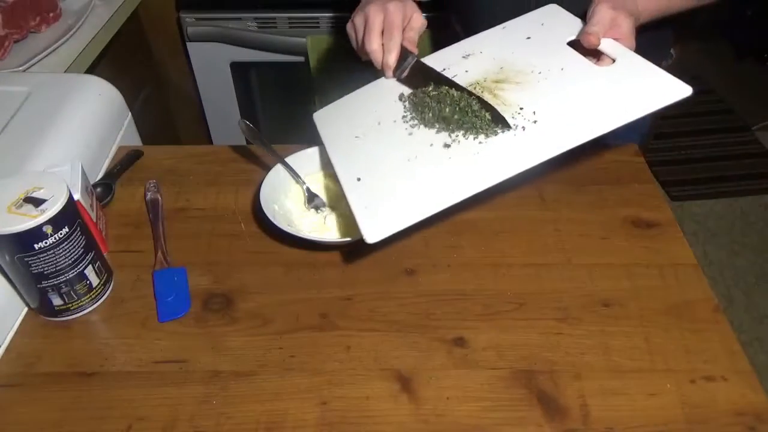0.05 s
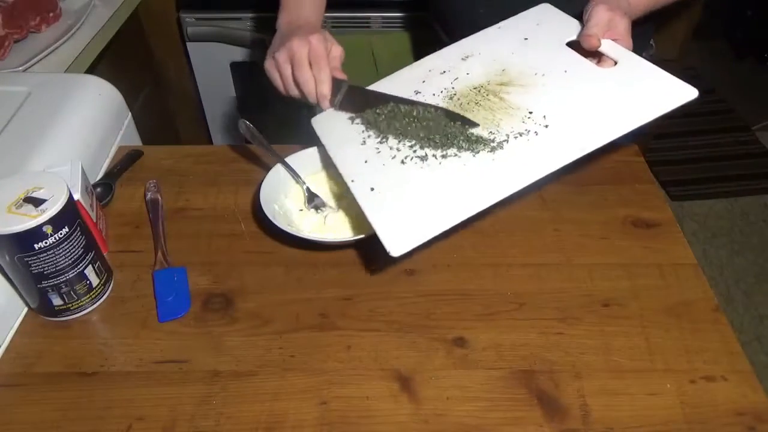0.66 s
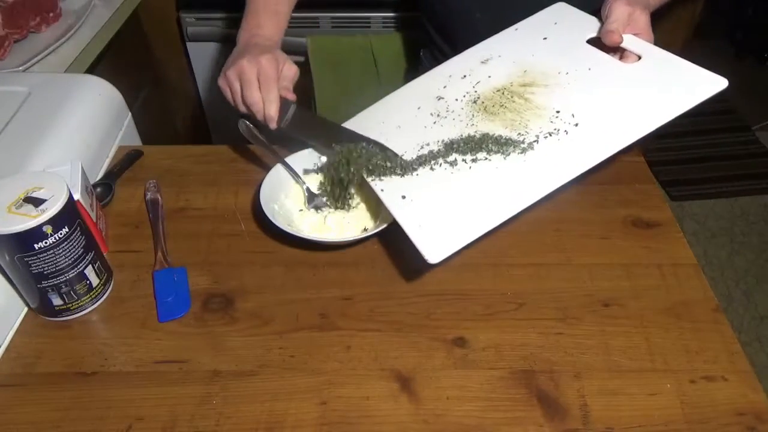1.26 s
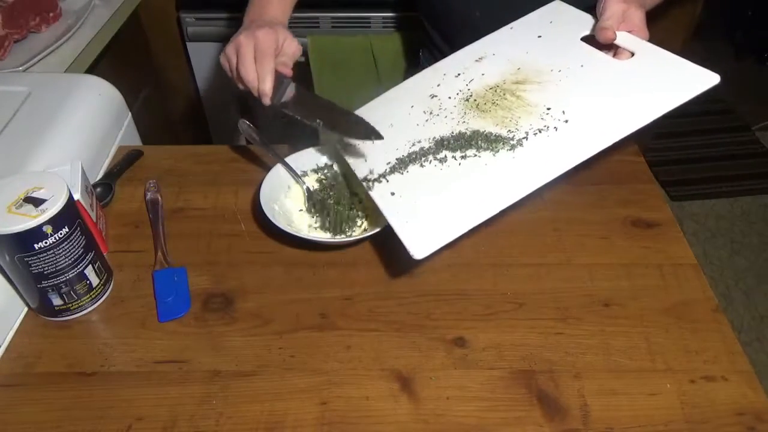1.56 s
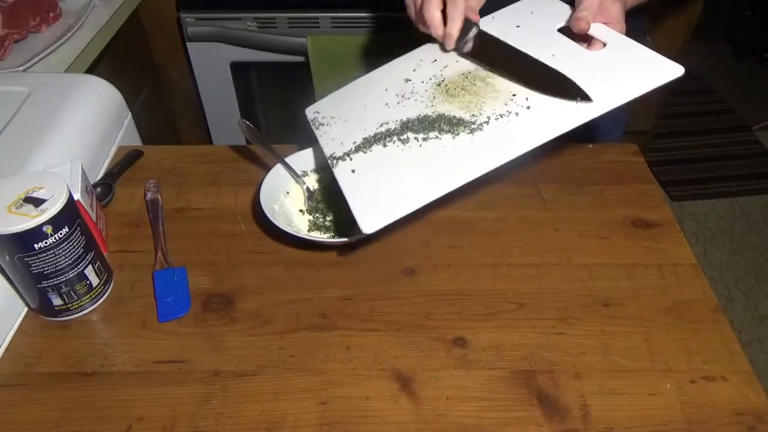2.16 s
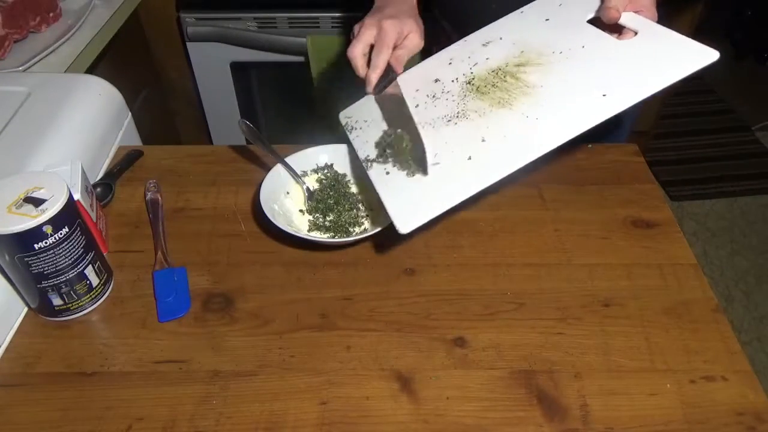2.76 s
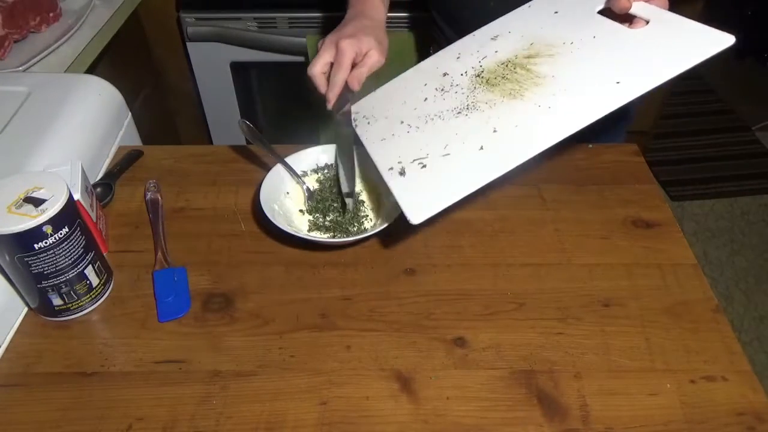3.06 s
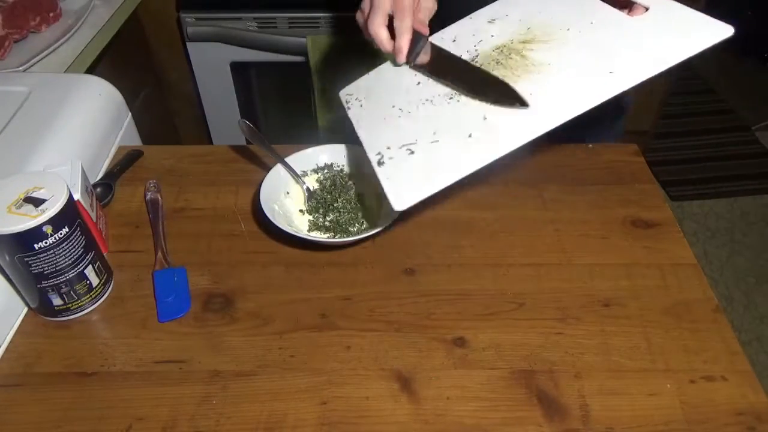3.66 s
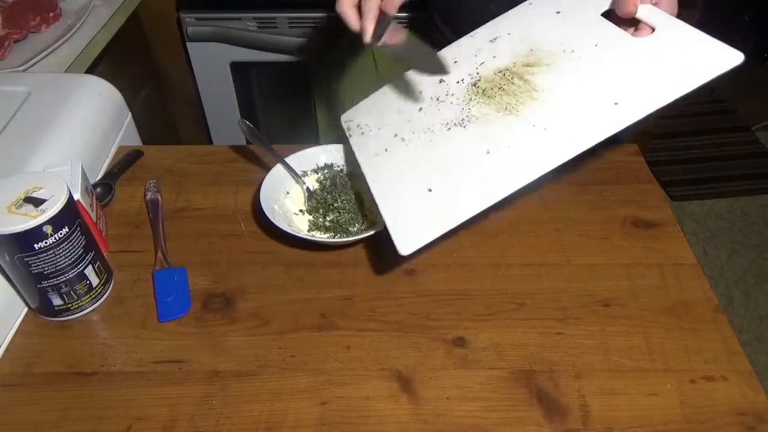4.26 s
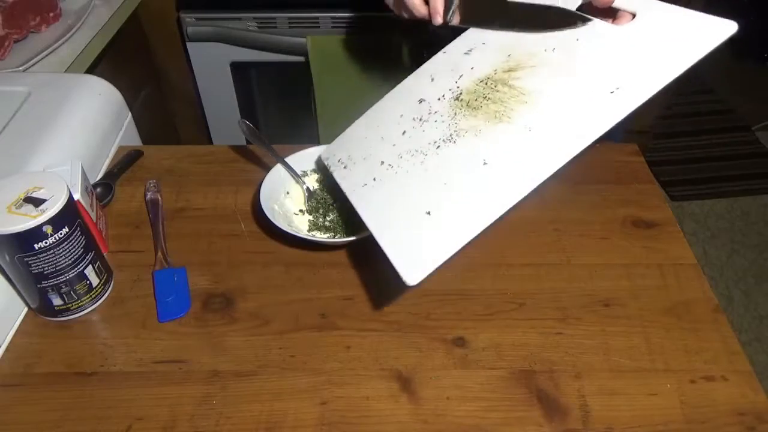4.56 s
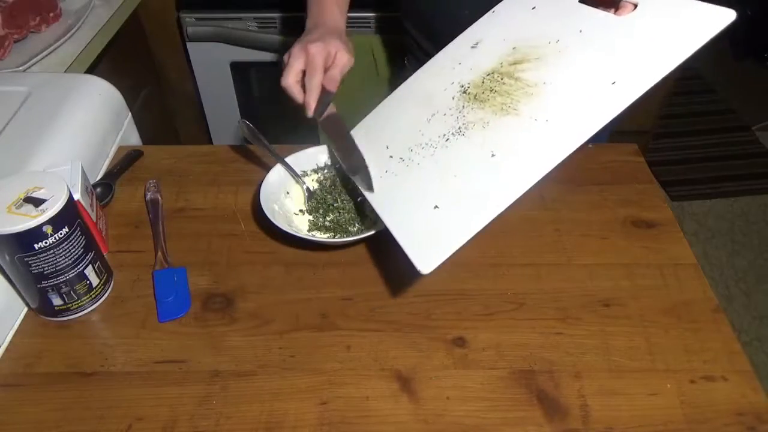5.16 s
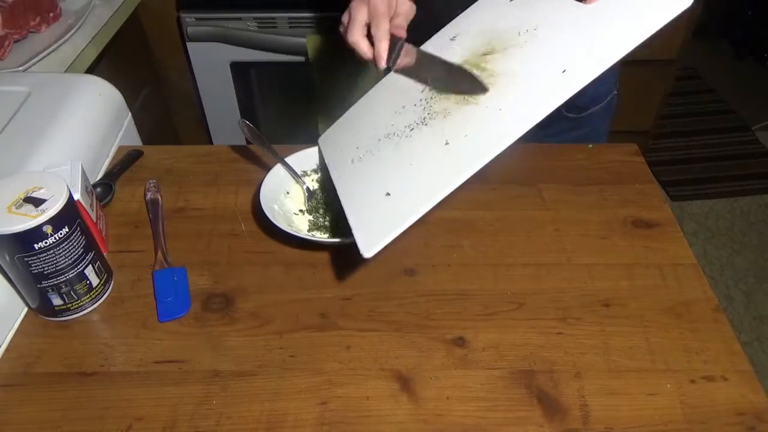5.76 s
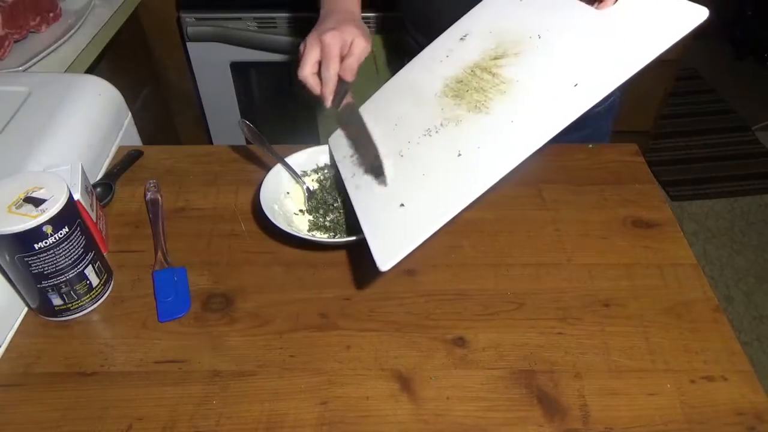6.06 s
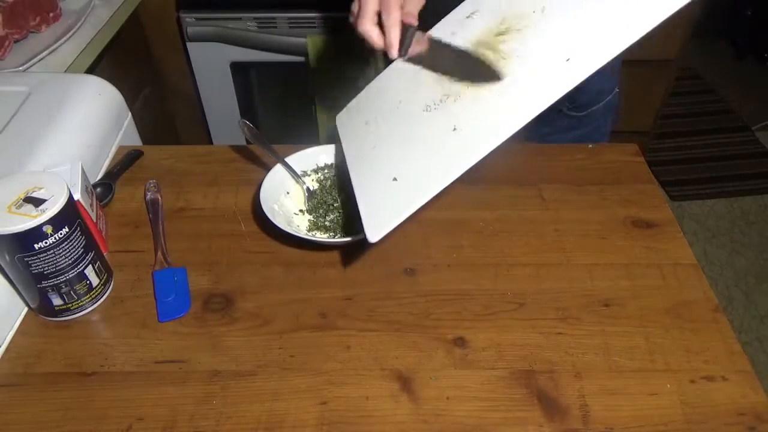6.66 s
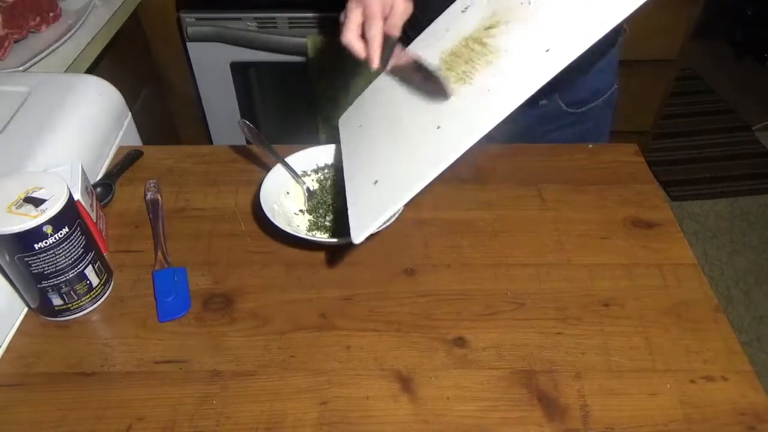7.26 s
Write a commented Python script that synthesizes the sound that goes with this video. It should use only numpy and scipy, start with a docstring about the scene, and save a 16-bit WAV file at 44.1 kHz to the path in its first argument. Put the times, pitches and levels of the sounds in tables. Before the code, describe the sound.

In a small kitchen with a quiet appliance hum and a very faint high whine, a steel blade taps down on a plastic board and drags across it, close to the microphone. Gentle scrapes come first, as chopped herbs patter lightly into a bowl. Firmer, hissing strokes follow about once a second, with crisp clicks, little squeaks and two short metallic twangs, the last strokes quick and bright.

```python
"""A small kitchen: a knife sweeps chopped herbs off a plastic board in eight strokes of one to three pushes.
The blade lands with a tick, then rasps along in tiny slips that ring board and steel. Snags squeak;
twice the blade is knocked and twangs. Early on, herbs patter into a bowl.
Table and walls answer, an appliance hums and a faint whine pulses."""
import sys
import numpy as np
from scipy import signal
from scipy.fft import rfft, irfft, next_fast_len
from scipy.io import wavfile
from scipy.ndimage import uniform_filter1d, map_coordinates

SR = 44100
rng = np.random.default_rng(int(sys.argv[2]) if len(sys.argv) > 2 else 0)


def to_wav(s):
    """Save 16-bit WAV."""
    ch = np.atleast_2d(s).T  # columns
    pcm = np.round(np.clip(ch, -1, 1) * 32767)  # PCM
    wavfile.write(sys.argv[1], SR, pcm.astype(np.int16))


N = 326781
TIME_S = np.arange(N) / SR
FFT_SIZE = next_fast_len(N + SR)
BIN_HZ = np.fft.rfftfreq(FFT_SIZE, 1 / SR)

# Knife pushes. Each row: start, attack, length and release t60 in seconds; force, mid-push swell,
# board, hiss, rim flare and flex in relative dB; flex pitch at start and end in Hz.
KNIFE_PUSHES = [ (0.052, 0.024, 0.086, 0.95, -36.5, 11.5, 6.5, -2.5, -6.5, 7.5, 1220, 1300),
                (0.584, 0.038, 0.19, 0.93, -41, 0.5, 8.5, -4, 0, 11, 915, 835),
                (0.872, 0.063, .2, 0.19, -41.5, 2, 7.5, -4, -1.5, 7.5, 920, 1340),
                (2.13, 0.1, 0.45, 0.56, -28, -1.5, 2, -3, -5.5, 2, 1330, 1180),
                (2.537, 0.15, 0.364, 0.41, -30.5, 3.5, 0.5, -0.5, 8.5, 10, 1270, 1324),
                (3.646, 0.037, 0.21, 0.098, -26.5, 1, 0, 0.5, 4.5, 2.5, 1210, 1315),
                (4.546, 0.062, 0.25, 0.22, -24, -5, -1.5, -1, -5, -5, 1260, 1290),
                (4.787, 0.017, 0.21, 0.27, -24.5, -2, 2, 0.5, -11, 5.5, 1330, 1360),
                (4.942, 0.039, 0.18, 0.17, -30.5, 2.5, -3.5, 1.5, 3.5, 7.5, 1470, 1295),
                (5.574, 0.08, 0.39, 0.43, -24.5, 1, 3, 0, -3.5, -3, 756, 890),
                (5.952, 0.032, 0.16, 0.061, -24.5, -0.5, -4.5, 2, 0.5, -3, 1220, 1740),
                (6.5972, 0.0022, 0.26, 0.13, -24.5, 1, -3.5, 5, -3.5, -3, 1200, 1230),
                (7.224, 0.0099, 0.17, 0.089, -27.5, 4, -2.5, 8.5, -6.5, -2.5, 1240, 1180)]
# Edge snags. Each row: peak time in seconds, level in dB, half duration in seconds, pitch and width in Hz.
SNAGS = [(0.748, -29, .017, 855, 110), (2.224, -26.5, 0.015, 5900, 900), (2.318, -27.5, 0.034, 1370, 169),
         (2.402, -22, 0.019, 1305, 170), (2.416, -26, 0.025, 4600, 1100), (2.503, -22.5, 0.016, 1250, 160),
         (2.513, -29.5, 0.043, 4560, 1000), (2.9, -24.5, 0.015, 1327, 170), (3.723, -28, 0.031, 5030, 260),
         (3.749, -29, .06, 680, 60), (3.83, -31, 0.035, 1215, 110), (3.835, -32, 0.02, 6000, 500),
         (3.843, -33.5, 0.016, 9700, 700), (4.885, -28, .025, 3130, 400), (4.894, -24.5, 0.016, 6150, 780),
         (4.961, -30, 0.048, 4100, 700), (5.007, -31.5, 0.098, 1430, 840), (5.722, -25, 0.023, 1460, 180),
         (5.791, -20, 0.015, 730, 140), (6.025, -20.5, 0.025, 1254, 160), (6.09, -26, .025, 5300, 1000),
         (6.642, -24.5, 0.027, 5830, 500), (6.68, -30, .07, 692, 70), (6.688, -26, 0.021, 8340, 700),
         (7.244, -19.5, 0.014, 6330, 700)]
# Blade landings, plus one small grit tick under the edge at 1.028 s. Each row: start in seconds, level in dB,
# knock and crisp top in relative dB.
LANDINGS = [(0.11, -21, 16, -13), (0.196, -19, 6.5, -1), (0.672, -25, 15, -8), (0.68, -20, 9, -13),
            (1.028, -25, 8, -12), (1.804, -42, -21, -4), (2.069, -11.5, 4.5, -12), (2.1256, -25.5, 15, -18),
            (2.953, -19, 4, -6), (2.993, -20, 3, -12), (3.6496, -6, 4, -17), (4.5193, -19, 5.5, -12),
            (4.553, -24, 6, -8), (5.55, -6.5, -11, -4), (5.5909, -12.5, 4, -9), (6.5671, -10, 7.5, -7),
            (6.5727, -8.5, 4, -10), (6.5992, -8, -10, -6), (7.1873, -8.5, -7, -7), (7.1903, -19, 9.5, -4)]
# Sideways blows. Each row: start in seconds, level in dB, bending pitch in Hz, overtones in relative dB,
# knock width in Hz.
BLADE_BLOWS = [(3.0312, -16, 330, 1, 165), (5.6075, -17.5, 288, 2, 280)]
# Blade overtones. Each row: frequency in Hz, level in relative dB, t60 in seconds.
BLADE_MODES = [(909, -17.5, 0.21), (1678, -18.5, 0.1), (1904, -13, 0.06), (2004, -17, 0.081),
               (2636, -22, 0.12), (3175, -13, 0.059), (4684, -14.5, 0.18), (6180, -15.5, 0.08),
               (6380, -18.5, 0.14), (8120, -22, 0.17), (9960, -27.5, 0.35)]
# Resonances of the pressed blade. Each row: centre in Hz, width in Hz, gain in dB.
PRESSED_MODES = [(2710, 82, -11), (3550, 54, -10), (4480, 390, -4), (5040, 510, -0.5), (6040, 500, -7.5),
                 (8330, 110, -12)]
# Near reflections off board and table. Each row: delay in seconds, linear gain.
NEAR_BOUNCES = [(.0009, 0.33), (.0021, 0.22)]
# Flow of falling herbs. Each row: time in seconds, level in relative dB.
HERB_FLOW = [(0, -44.5), (0.25, -60.5), (0.5, -59.5), (0.7, -54), (1.2, -53), (1.37, -53), (1.45, -58),
             (1.59, -57), (1.72, -82)]
# Room decay. Each row: frequency in Hz, t60 in seconds.
ROOM_DECAY = [(150, 0.23), (800, 0.55), (1400, 0.43), (5500, 0.39), (11000, 0.26)]
# Appliance tones. Each row: frequency in Hz, level in relative dB.
HUM_TONES = [(102.3, -65), (161.5, -56.5), (199.2, -55.5), (296.1, -54), (317.6, -50), (368, -57)]

# Spectra. Each row: frequency in Hz, density in relative dB.
BOARD_SPECTRUM = [(110, -48.5), (230, -20), (350, -15.5), (450, -17), (560, -11), (640, -0.5), (705, 1.5),
                  (765, -7), (930, -4.5), (1080, -15.5), (1220, -4), (1400, -12), (1700, -12),
                  (2600, -42.5)]  # scraped plastic
RASP_SPECTRUM = [(900, -38), (1400, -10), (1650, -1), (2300, 3.5), (2700, 3), (3500, 2.5), (4200, -3.5),
                 (6000, -28.5)]  # dragged edge, middle band
HISS_SPECTRUM = [(2500, -42), (4100, -0.5), (5000, 0), (6500, 3.5), (7500, 2.5), (8800, -5.5), (9550, -4.5),
                 (10200, -4), (11000, -10.5)]  # dragged edge, treble
TICK_SPECTRUM = [(40, -46), (150, 9.5), (600, 11.5), (1500, 4), (2200, 10.5), (5500, 9.5), (8000, 2),
                 (11000, -17)]  # steel hitting plastic
CRISP_SPECTRUM = [(4000, -26), (8600, 3), (11000, -7)]  # bare edge landing
KNOCK_SPECTRUM = [(130, -31.5), (400, -12.5), (690, 2.5), (1040, -9.5), (1300, -2), (3000, -29)]  # struck board
LEAF_SPECTRUM = [(710, -35), (1200, 8.5), (1540, -3), (1920, -1.5), (6360, 0.5), (10800, -8.5),
                 (14100, -40)]  # falling crumbs
AIR_SPECTRUM = [(25, -44), (44, -22), (104, -10.5), (127, -20), (144, -15.5), (191, -12), (246, -5),
                (266, -14), (309, -7), (630, -19), (2750, -32), (4130, -33.5), (10800, -42)]  # room air


def scrape():
    """The edge catches and slips; shared catches shake board, blade, edge and tip."""
    catches = slips(rate_hz=1700, scatter_db=2.5)
    chatter = amp(0.14 * wobble(35) + 1.42 * wobble(230))
    friction = lambda: unit(chatter * (catches + 1.19 * slips(rate_hz=9000, scatter_db=5.5)))
    board_gain, flex_gain, rasp_gain, hiss_gain, tip_gain, flex_hz, travel = pushes()
    board = filtered(friction() * board_gain, body(BOARD_SPECTRUM))
    blade = flex_gain * ringing(friction(), flex_hz, width_hz=255)
    rasp = amp(-1.12) * filtered(friction() * rasp_gain, body(RASP_SPECTRUM))
    hiss = amp(-2) * filtered(friction() * hiss_gain, body(HISS_SPECTRUM))
    edge = pressed_blade(rasp + hiss)
    tip = tip_gain * ringing(friction(), 9630 + 170 * wobble(8.8), width_hz=420)
    return amp(-1) * (board + blade) + amp(-2.5) * near_bounces(edge, travel) + tip


def pushes():
    """Each push rises, holds and dies; toward the rim the drive passes from board to bending blade."""
    board_fade_db, flex_rise_db, tip_db = 2, 5.5, -15
    flare_s, flex_t60_s = 0.045, 0.47
    power, flex_hz, progress = np.zeros((5, N)), np.zeros(N), np.zeros(N)
    for (start_s, attack_s, length_s, release_s, db, swell_db,
         board_db, hiss_db, rim_db, flex_db, from_hz, to_hz) in KNIFE_PUSHES:
        start = round(start_s * SR)
        t = TIME_S[:N - start][:SR]
        span = slice(start, start + len(t))
        travel = np.minimum(t / length_s, 1)
        near_rim = travel ** 1.7
        after_s = np.maximum(t - length_s, 0)
        force_db = db + swell_db * (np.sin(np.pi * travel) - 0.5) - 60 * after_s / release_s
        force = np.minimum(t / attack_s, 1) * amp(force_db)
        flare_db = rim_db * np.exp(-((t - length_s) / flare_s) ** 2)  # the edge skids off
        shares = [amp(board_db - board_fade_db * near_rim),
                  amp(flex_db - flex_rise_db * (2 - travel) - 60 * after_s / flex_t60_s),
                  amp(0.64 * flare_db),  # rasp
                  amp(hiss_db + flare_db),
                  travel * amp(tip_db + hiss_db + flare_db)]
        power[:, span] += (force * np.array(shares)) ** 2
        flex_hz[span] = from_hz + (to_hz - from_hz) * near_rim
        progress[span] = travel
    return (*np.sqrt(power), flex_hz, progress)


def pressed_blade(x, detune=0.023, patch_db=1.5):
    """The wandering contact shifts the blade's resonances and colours the rasp in brief patches."""
    steel = x + sum(amp(db) * swept(x, hz * np.exp(detune * wobble(7)), width_hz)
                    for hz, width_hz, db in PRESSED_MODES)
    spectrum = signal.stft(steel, nperseg=256)[2]
    patches = uniform_filter1d(rng.standard_normal(spectrum.shape), size=5, axis=0)
    patches = uniform_filter1d(patches, size=16, axis=1)
    return signal.istft(spectrum * amp(patch_db * unit(patches)), nperseg=256)[1][:N]


def near_bounces(x, travel, path_growth=0.3, hand_sway=0.075):
    """Reflection paths lengthen over a push, so their comb slides down."""
    stretch = lambda: (1 + path_growth * travel) * np.exp(hand_sway * wobble(7))
    return x + sum(gain * np.interp(TIME_S - delay_s * stretch(), TIME_S, x)
                   for delay_s, gain in NEAR_BOUNCES)


def squeaks(sag=0.012):
    """A snag shakes one narrow resonance, which slides down as the contact moves."""
    out = np.zeros(N + SR)
    t = np.arange(-SR // 5, SR // 5) / SR
    for peak_s, db, half_s, hz, width_hz in SNAGS:
        pitch_hz = hz * (1 - sag * np.tanh(t / half_s))
        judder = ringing(rng.standard_normal(len(t)), pitch_hz, width_hz)
        out[round((peak_s + t[0]) * SR):][:len(t)] += amp(db) * np.exp(-(t / half_s) ** 2) * judder
    return out[:N]


def ticks():
    """Steel lands on plastic, or grit ticks under the edge: a crack with a crisp top, a choked blade ring and a
    board knock."""
    cracks, tops, rings, knocks = np.zeros((4, N + SR))
    t = np.arange(SR // 20) / SR
    for start_s, db, knock_db, crisp_db in LANDINGS:
        start = round(start_s * SR)
        cracks[start:][:len(t)] += decay(t, db, t60_s=0.0079) * rng.standard_normal(len(t))
        for t60_s in (0.0055, 0.0045):
            tops[start:][:len(t)] += decay(t, db + crisp_db, t60_s) * rng.standard_normal(len(t))
        ring = sum(amp(mode_db) * np.sin(2 * np.pi * hz * rng.normal(1, 0.039) * t)  # contact detunes it
                   for hz, mode_db, _ in BLADE_MODES)
        rings[start:][:len(t)] += decay(t, db - 17.5, t60_s=0.04) * unit(ring)
        knocks[start] = amp(db + knock_db)
    crack = amp(-4.5) * filtered(cracks[:N], body(TICK_SPECTRUM))
    top = amp(-11) * filtered(tops[:N], body(CRISP_SPECTRUM))
    knock = amp(3.5) * filtered(knocks[:N], body(KNOCK_SPECTRUM))
    return crack + top + rings[:N] + knock


def twangs(grip_blur_hz=320):
    """The knocked blade flexes: a crack, a low note, a hollow knock and overtones blurred by the grip."""
    tones, cracks, knocks = np.zeros((3, N + SR))
    t = np.arange(SR // 2) / SR
    n = len(t)
    for start_s, db, bend_hz, overtone_db, knock_width_hz in BLADE_BLOWS:
        start = round(start_s * SR)
        bend = np.sin(2 * np.pi * bend_hz * t) * decay(t, 4, t60_s=0.09) * (1 - np.exp(-t / 0.002))
        drifts = grip_blur_hz * np.cumsum(rng.standard_normal((len(BLADE_MODES), n)), axis=1) / SR
        ring = sum(decay(t, mode_db, t60_s) * np.sin(2 * np.pi * (hz * t + drift + rng.random()))
                   for (hz, mode_db, t60_s), drift in zip(BLADE_MODES, drifts))
        clang = 1 + decay(t, 10, t60_s=0.015)
        tones[start:][:n] += amp(db) * (bend + amp(overtone_db) * ring * clang)
        cracks[start:][:n] += decay(t, db + overtone_db - 6, t60_s=0.057) * rng.standard_normal(n)
        hollow = ringing(rng.standard_normal(2 * n), np.full(2 * n, bend_hz), knock_width_hz, order=4)[n:]
        knocks[start:][:n] += decay(t, db - 7, t60_s=0.19) * (1 - np.exp(-t / 0.0013)) * hollow
    low_cut = signal.butter(2, 150, "highpass", fs=SR, output="sos")  # a narrow blade radiates no bass
    return signal.sosfilt(low_cut, (tones + knocks)[:N]) + filtered(cracks[:N], body(TICK_SPECTRUM))


def herbs():
    """Leaf crumbs slide over the edge and patter into the bowl."""
    flow_db = np.interp(TIME_S, *np.transpose(HERB_FLOW), right=-120)
    patter = filtered(slips(rate_hz=2000, scatter_db=4.5), body(LEAF_SPECTRUM))
    return amp(flow_db - 5) * unit(patter)


def kitchen_reverb(x, wet_db, side_db, positions=44):
    """Table and walls answer anew at each knife position; each frequency dies at its own rate."""
    out = np.zeros((2, N + 2 * SR))
    hop, predelay = N // positions, SR // 500
    padded = np.pad(x, (hop, 2 * hop))
    fade = np.sin(np.pi * np.arange(2 * hop) / (2 * hop))
    hz, t, noise = signal.stft(rng.standard_normal((positions + 1, 2, SR * 3 // 5)), SR, nperseg=256)
    early_boost = 1 + 1.68 * np.exp(-t / 0.0034)  # near surfaces answer first and loudest
    t60_s = log_interp(ROOM_DECAY, hz)[:, None]
    tails = signal.istft(noise * early_boost * decay(t, 0, t60_s), SR, nperseg=256)[1]
    for k, tail in enumerate(tails):
        piece = fade * padded[k * hop:][:2 * hop]
        answer = signal.fftconvolve(piece[None], tail / np.linalg.norm(tail[0]), axes=1)
        out[:, k * hop + predelay:][:, :answer.shape[1]] += answer
    mid, side = out[:, hop:hop + N]
    return stereo(amp(wet_db) * mid, amp(side_db) * side)


def room_air():
    """Steady low noise, slightly wide."""
    mid, side = unit(filtered(rng.standard_normal((2, N)), amp(log_interp(AIR_SPECTRUM, BIN_HZ))))
    return stereo(amp(-48.5) * mid, amp(-60.5) * side)


def appliance_hum():
    """Low tones waver in level and phase."""
    return amp(-2.5) * sum(amp(db + 2.24 * wobble(2.884)) * tone(hz, 0.55 * wobble(6.5))
                           for hz, db in HUM_TONES)


def whine(pitch_hz=4110, pulse_hz=29.97, first_s=0.0082):
    """A faint, unsteady high tone in rapid pulses."""
    pulses = np.cos(np.pi * pulse_hz * (TIME_S - first_s)) ** 20
    return amp(-61.5 + 1.2 * wobble(25)) * pulses * tone(pitch_hz, 0.85 * wobble(95))


def amp(db):
    """Decibels to gain."""
    return 10 ** (np.asarray(db) / 20)


def decay(t, db, t60_s):
    """Gain falling from db by 60 dB every t60_s."""
    return amp(db - 60 * t / t60_s)


def unit(x):
    """Scaled to rms 1."""
    return x / np.sqrt(np.mean(np.abs(x) ** 2) + 1e-20)


def tone(hz, phase_rad):
    """Sine of rms 1."""
    return np.sqrt(2) * np.sin(2 * np.pi * hz * TIME_S + phase_rad)


def wobble(rate_hz):
    """Smooth random curve with knots at rate_hz."""
    return map_coordinates(rng.standard_normal(int(N * rate_hz / SR) + 4), [TIME_S * rate_hz])


def slips(rate_hz, scatter_db):
    """Tiny releases of random time and size, rms 1."""
    size = amp(scatter_db * np.clip(rng.standard_normal(N), -2, 2))
    return unit((rng.random(N) < rate_hz / SR) * size * rng.choice([-1, 1], N))


def log_interp(points, hz):
    """(Hz, value) points read on a log frequency axis."""
    point_hz, values = np.transpose(points)
    return np.interp(np.log(hz + 1), np.log(point_hz), values)


def filtered(x, response):
    """x through a frequency response."""
    return irfft(rfft(x, FFT_SIZE) * response, FFT_SIZE)[..., :N]


def body(spectrum):
    """Minimum-phase response of unit energy."""
    cepstrum = irfft(np.log(unit(amp(log_interp(spectrum, BIN_HZ)))), FFT_SIZE)
    cepstrum[1:FFT_SIZE // 2] *= 2
    cepstrum[FFT_SIZE // 2 + 1:] = 0
    return np.exp(rfft(cepstrum))


def swept(x, hz, width_hz, order=1):
    """x through a resonance that follows the curve hz, gain 1 at centre."""
    carrier = np.exp(2j * np.pi * np.cumsum(hz) / SR)
    lowpass = signal.butter(order, width_hz / 2, fs=SR, output="sos")
    return 2 * (signal.sosfilt(lowpass, x / carrier) * carrier).real


def ringing(x, hz, width_hz, order=2):
    """x rings a moving resonance, rms 1."""
    return unit(swept(x, hz, width_hz, order))


def stereo(mid, side):
    """Mid and side to left and right."""
    return np.array([mid + side, mid - side])


def scene():
    """Knife and herbs straight ahead in the humming kitchen."""
    work = scrape() + squeaks() + ticks() + twangs() + herbs()
    reverb = kitchen_reverb(work, wet_db=-4, side_db=-11.5)
    return work + reverb + room_air() + appliance_hum() + whine()


def record(dry):
    """Steep low-pass."""
    cutoff_hz = 11040
    return filtered(dry, 1 / np.sqrt(1 + np.minimum(BIN_HZ / cutoff_hz, 1.2) ** 700))


dry = scene()
out = record(dry)
to_wav(out)
```